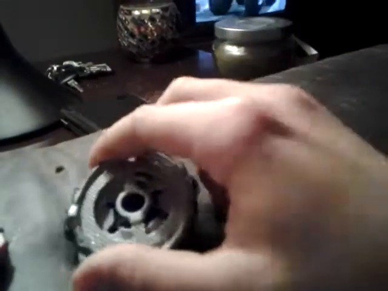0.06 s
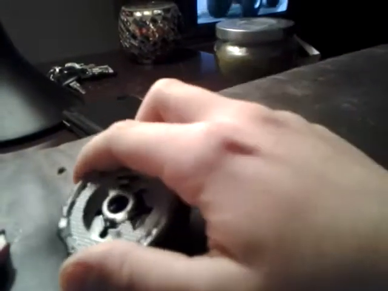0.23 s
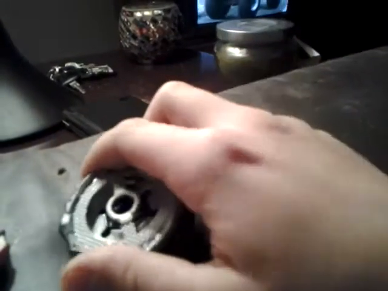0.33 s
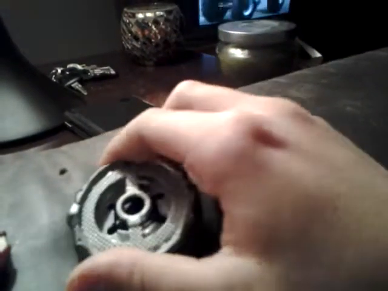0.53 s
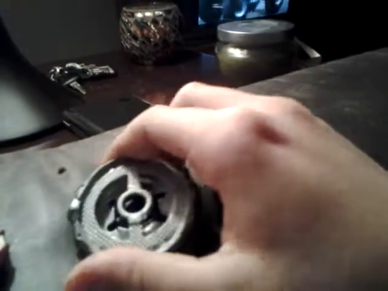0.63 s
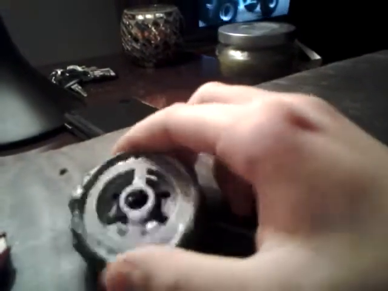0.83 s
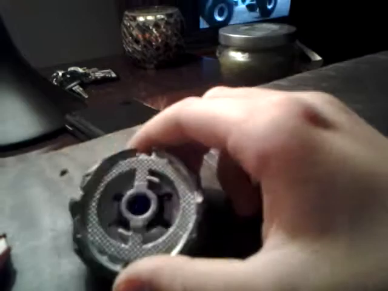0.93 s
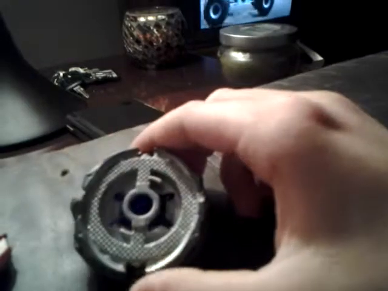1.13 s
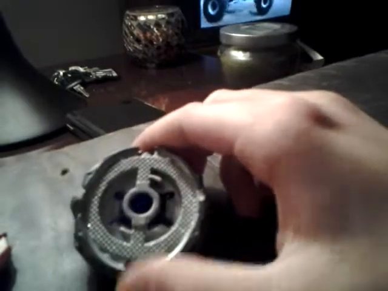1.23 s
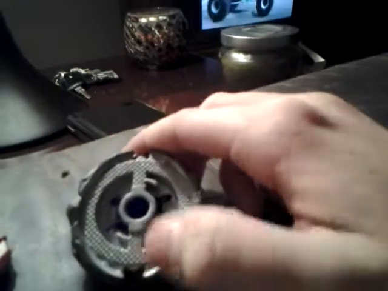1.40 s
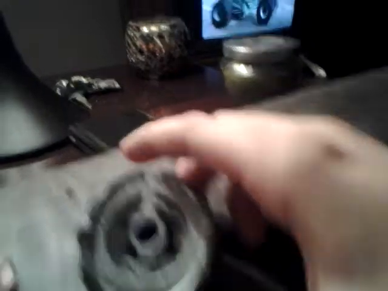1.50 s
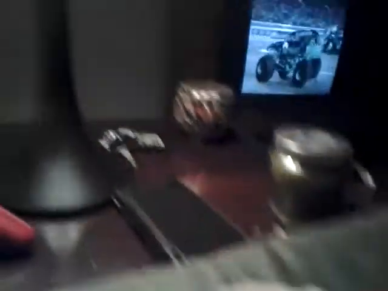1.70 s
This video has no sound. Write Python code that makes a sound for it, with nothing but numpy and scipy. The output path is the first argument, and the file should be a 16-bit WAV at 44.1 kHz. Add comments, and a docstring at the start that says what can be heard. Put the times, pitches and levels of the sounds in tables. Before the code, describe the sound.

A metal and plastic spinning top clicks as it is turned in the hand, close by. Light plastic ticks lead into one loud, sharp snap at about 0.25 seconds, with a small thump and a brief metallic ring. Two softer snaps follow near 0.9 and 1.1 seconds among dull ticks, with a last faint tick near 1.6. Quiet room noise and a faint, sinking hum lie underneath.

```python
"""A small, quiet room: a metal and plastic spinning top is turned in the hand near a mono microphone.
Its parts snap together once loudly and twice softly. Each snap cracks, thumps the plastic body
and rings the metal. Loose plastic ticks between the snaps.
Behind it are room noise, a slowly sinking hum and a picture tube's whistle."""
import sys
import numpy as np
from scipy import signal
from scipy.fft import rfft, irfft
from scipy.io import wavfile
from scipy.ndimage import uniform_filter1d

SR = 44100
rng = np.random.default_rng(int(sys.argv[2]) if len(sys.argv) > 2 else 0)


def dump_mix(stems):
    """Bounce the given channels to the path in sys.argv[1] as a 16-bit WAV at rate SR."""
    frames = np.atleast_2d(stems).T  # one column per channel
    limited = np.clip(frames, -1, 1)  # hard clip at full scale
    pcm = np.round(limited * 32767).astype(np.int16)
    wavfile.write(sys.argv[1], SR, pcm)


N = 77175
T = np.arange(N) / SR

# tone colour of the room noise (frequency [Hz], level [dB])
ROOM_NOISE_COLOUR = [(15, -7), (28, -37), (55, -10), (80, -17.5), (125, -11), (190, -10), (270, -14.5),
                     (380, -18), (460, -24), (680, -24.5), (1100, -25.5), (1900, -34.5), (4000, -34.5),
                     (8800, -42), (15500, -46)]
# narrow whirs in the room noise (frequency [Hz], width [Hz], level [dB])
WHIRS = [(756.4, 10, -63), (905, 48, -57.5)]
# how the hum changes (time [s], pitch [Hz], level [dB])
HUM_PATH = [(0, 190.9, -66), (0.4, 187, -51.5), (0.7, 187, -50.5), (0.9, 185.4, -53), (1.02, 185.9, -47.5),
            (1.249, 182.8, -51.5), (1.451, 177.2, -48.5), (1.62, 172, -46.5), (1.75, 164, -55)]
# tone colour of the room's echo (frequency [Hz], level [dB])
ECHO_COLOUR = [(100, 7), (300, -4), (650, -2.5), (1400, -6), (2600, -4.5), (5400, -2), (9000, 2),
               (12500, -10.5), (16000, 1)]
# ticks of loose plastic (time [s], level [dB], pitch [Hz], knock on the body [dB])
TICKS = [(0.1343, -33.5, 1244, -29), (0.2200, -31.5, 1180, -32), (0.2333, -24.5, 1170, -28),
         (0.2396, -10, 1375, -29), (0.5021, -38.5, 1130, -56), (0.8015, -39.5, 1280, -60),
         (0.9097, -34.5, 1120, -45), (0.921, -28.5, 1155, -44), (0.9530, -26, 1160, -54),
         (0.958, -32.5, 1164, -64), (0.9688, -55, 1170, -57), (0.9756, -43, 1230, -57),
         (1.0824, -33, 1175, -58), (1.5971, -42.5, 1120, -53)]
# the tones in one tick (frequency [times its pitch], level [dB])
TICK_TONES = [(0.701, -7), (1.002, 6.5), (1.27, 0.5)]
# tones of the hand-held body (frequency [Hz], level [dB], time to fade by 60 dB [s])
BODY_TONES = [(225, -20, 0.016), (330, -1, 0.011), (404, -6.5, 0.014), (600, -5, 0.013)]
# tones of the plastic shell (frequency [Hz], level [dB], fade time [s])
SHELL_TONES = [(780, -4.5, 0.0093), (916, -2.5, 0.012), (1225, -18.5, 0.054), (1445, -9.5, 0.0088),
               (1650, -38, 0.022), (2140, -14, 0.0056)]
# tones of the metal wheel (frequency [Hz], level [dB], fade time [s])
WHEEL_TONES = [(3890, -3, .05), (4485, -12, .05), (5290, 1, .06), (5375, -3, .09), (5485, -1, .14),
               (5930, -6, .04), (6760, -11, .05), (7710, -10, .04), (8435, -8, .05), (8778, -6, .07),
               (8922, -8, .11), (9900, -6, .045), (10980, -11, .035), (11380, -8, .05)]
# tones of the thin metal ring (frequency [Hz], level [dB], fade time [s])
THIN_RING_TONES = [(3830, -6, .032), (5065, 0, .032), (5600, -5, .028), (6795, -9, .03), (8870, -9, .045),
                   (11528, -1, .038), (12560, 0, .03), (13900, -14, .035)]
# tone colour of the crack as parts meet (frequency [Hz], level [dB])
CRACK_COLOUR = [(120, -15), (400, -9), (1000, 4.5), (1700, -10), (2400, -12), (2950, -21), (3650, -4),
                (4500, -4.5), (5400, 2.5), (6500, -10.5), (9000, -8.5), (11500, -6.5), (15500, -32)]
# snaps (time [s], crack [dB], scrape length [s], crack brightness [dB per octave], body thump [dB],
# shell clack [dB], wheel [dB], thin ring [dB], ringing time the fingers allow [factor])
SNAPS = [(0.2424, -10.5, 0.0025, 2, -6, -19, -25.5, -47, 1.05),
         (0.9134, -32.5, 0.0037, 1, -30, -23, -61, -27.5, 1.57),
         (1.0717, -34, 0.0041, -4.5, -41, -23, -68, -41.5, 0.84)]

BUZZ_RATE, WHEEL_BUZZ, RING_BUZZ = 240, .5, .4  # flutter of loose metal: changes a second, two depths


def undb(db):
    """Turn decibels into a number to multiply by."""
    return 10 ** (np.asarray(db) / 20)


def unit(x):
    """Scale a signal to an average strength (rms) of 1."""
    return x / np.sqrt(np.mean(x ** 2))


def noise(points):
    """Noise of strength 1, coloured by (frequency [Hz], level [dB]) points."""
    hz, db = np.array(points).T
    freqs = np.maximum(np.arange(N // 2 + 1) * SR / N, 1)
    gains = undb(np.interp(np.log(freqs), np.log(hz), db))
    return unit(irfft(rfft(rng.standard_normal(N)) * gains, N))


def walk(rate):
    """A smooth random wobble of strength 1 that changes about `rate` times a second."""
    hold = int(SR / rate)
    steps = np.repeat(rng.standard_normal(N // hold + 1), hold)
    return unit(uniform_filter1d(uniform_filter1d(steps, hold), hold)[:N])


def ring(tones, buzz=0, free=1):
    """Fading tones of a struck part: `buzz` makes them flutter, `free` scales their fade time."""
    t = T[:SR // 3]
    out = np.zeros(len(t))
    for hz, db, fade_s in tones:
        swing = np.exp((2j * np.pi * hz - np.log(1000) / (fade_s * free)) * t)
        if buzz:
            flutter = (walk(BUZZ_RATE) + 1j * walk(BUZZ_RATE))[:len(t)]
            swing = swing * (1 + buzz * flutter) / np.sqrt(1 + 2 * buzz ** 2)
        out += undb(db) * swing.imag
    return out


def add(out, start, sound):
    """Mix a sound into `out`, beginning at `start` seconds."""
    i = int(start * SR)
    part = sound[:N - i]
    out[i:i + len(part)] += part


def room_noise():
    """A steady rush of noise with two faint, narrow whirs."""
    out = undb(-49.5) * noise(ROOM_NOISE_COLOUR)
    for hz, width, db in WHIRS:
        narrow_band = signal.iirpeak(hz, hz / width, fs=SR)
        whir = signal.lfilter(*narrow_band, rng.standard_normal(N))
        out += undb(db) * unit(whir)
    return out


def hum():
    """A low hum that wavers and slowly sinks in pitch."""
    times, hz, db = np.array(HUM_PATH).T
    pitch = np.interp(T, times, hz) * (1 + .012 * walk(rate=24.44))
    level_db = np.interp(T, times, db) + 2.5 * walk(rate=21.66)
    tone = np.sin(2 * np.pi * np.cumsum(pitch) / SR)
    return undb(level_db) * unit(tone)


def tube_whistle():
    """A picture tube whistles faintly at the rate it draws its lines."""
    line_hz = 15734
    level_db = -66.5 + walk(rate=12.3)
    return undb(level_db) * unit(np.sin(2 * np.pi * line_hz * T))


def room_echo(sound):
    """The small room answers with a short wash of echoes and one bounce off a near wall."""
    build_s, fade_s = .0031, .3
    swell = 1 - np.exp(-T / build_s)
    fade = np.exp(-np.log(1000) * T / fade_s)  # down 60 dB after fade_s
    wash = noise(ECHO_COLOUR) * swell * fade
    wash /= np.sqrt(np.sum(wash ** 2))
    echoes = np.zeros(N)
    add(echoes, start=.004, sound=undb(-11.5) * wash)
    add(echoes, start=.0098, sound=undb([-20.5]))  # the near wall
    return signal.fftconvolve(sound, echoes)[:N]


def plastic_ticks():
    """Loose plastic makes short, dull ticks that also knock the body."""
    rise_s, fade_s, muffle_hz = .00036, .0067, 1890
    out = np.zeros(N)
    body = ring(BODY_TONES)
    swell = 1 - np.exp(-T[:len(body)] / rise_s)
    for start, db, hz, knock_db in TICKS:
        tick = ring([(hz * ratio, tone_db, fade_s) for ratio, tone_db in TICK_TONES])
        add(out, start, swell * (undb(db) * tick + undb(knock_db) * body))
    muffle = signal.butter(6, muffle_hz, fs=SR, output="sos")
    return signal.sosfilt(muffle, out)


def snaps():
    """Parts scrape briefly and ring the metal; crack, thump and clack repeat as they bounce once."""
    crack_fade_s, bounce_s, bounce_db = .004, .0031, -13
    out = np.zeros(N)
    body, shell = ring(BODY_TONES), ring(SHELL_TONES)
    for start, crack_db, scrape_s, brightness, body_db, shell_db, wheel_db, ring_db, free in SNAPS:
        wheel = undb(wheel_db) * ring(WHEEL_TONES, WHEEL_BUZZ, free)
        thin_ring = undb(ring_db) * ring(THIN_RING_TONES, RING_BUZZ, free)
        add(out, start, wheel + thin_ring)
        plastic = undb(body_db) * body + undb(shell_db) * shell
        colour = [(hz, db + brightness * np.log2(hz)) for hz, db in CRACK_COLOUR]
        contact = np.exp(-np.maximum(T - scrape_s, 0) / crack_fade_s)  # holds, then fades
        for delay, gain in ((0, 1), (bounce_s, undb(bounce_db))):
            crack = undb(crack_db) * noise(colour) * contact
            add(out, start + delay, gain * crack)
            add(out, start + delay, gain * plastic)
    return out


def scene():
    """The spinning top, its echo and the background, the same in both channels."""
    bass_cut = signal.butter(2, 229, "high", fs=SR, output="sos")  # the top's sounds carry no deep bass
    top = signal.sosfilt(bass_cut, snaps() + plastic_ticks())
    mono = tube_whistle() + room_echo(top) + room_noise() + hum() + top
    return np.array([mono, mono])


def record(dry):
    """The recorder flattens peaks that are too loud and cuts the highest treble."""
    highest_hz = 15900
    treble_cut = signal.ellip(10, .2, 80, highest_hz, fs=SR, output="sos")
    return signal.sosfilt(treble_cut, np.clip(dry, -1, 1))


dry = scene()
out = record(dry)
dump_mix(out)
```